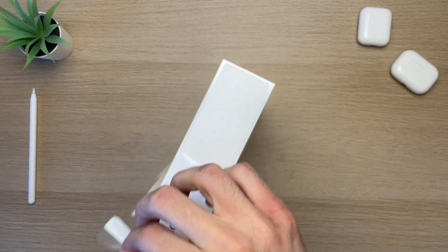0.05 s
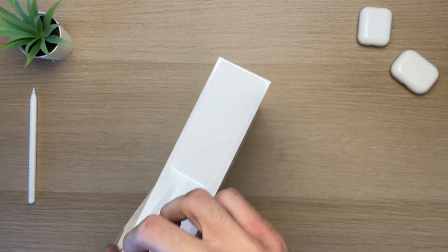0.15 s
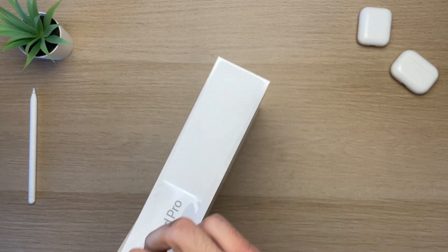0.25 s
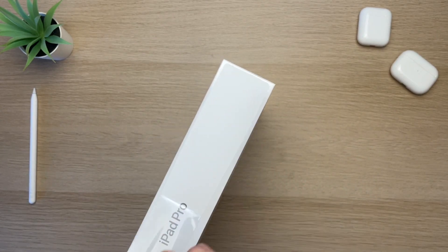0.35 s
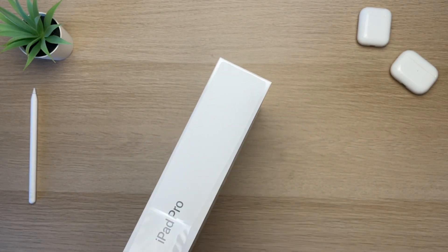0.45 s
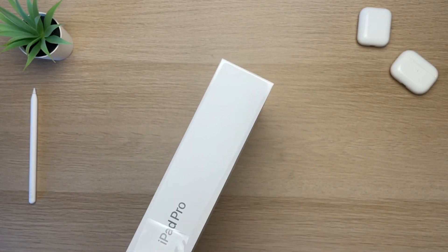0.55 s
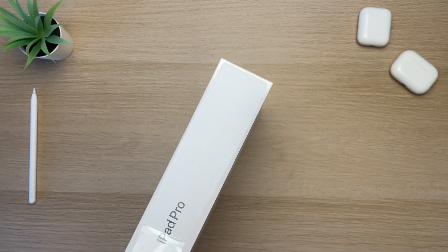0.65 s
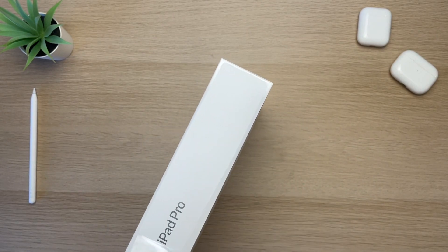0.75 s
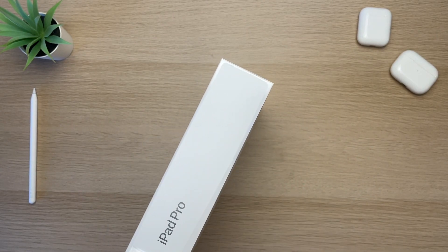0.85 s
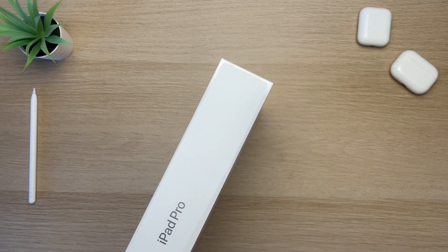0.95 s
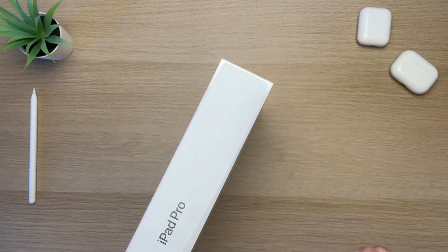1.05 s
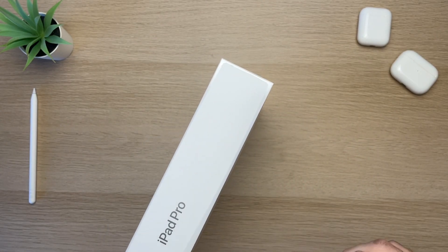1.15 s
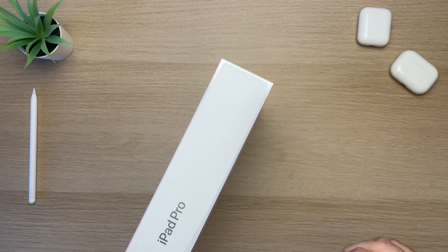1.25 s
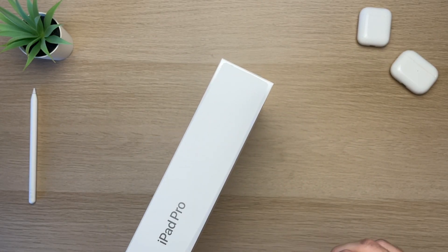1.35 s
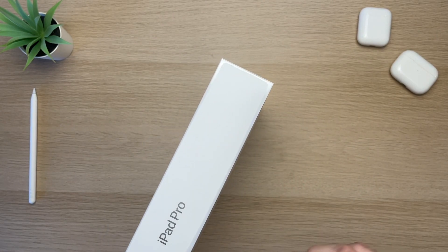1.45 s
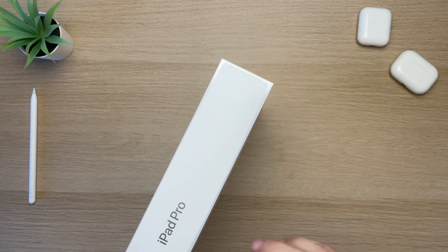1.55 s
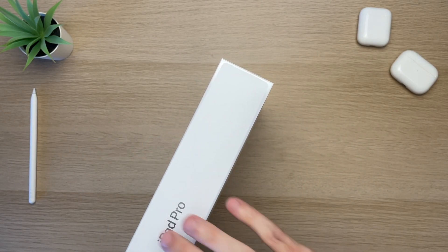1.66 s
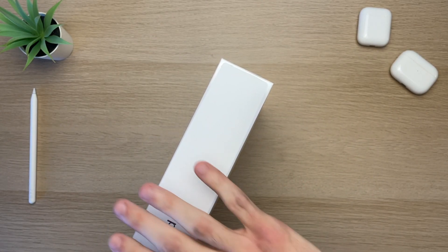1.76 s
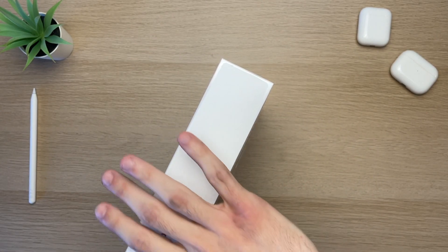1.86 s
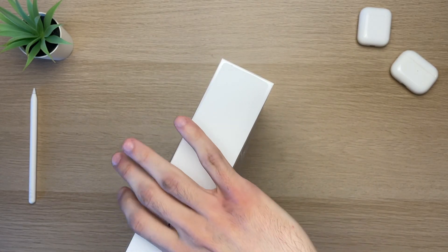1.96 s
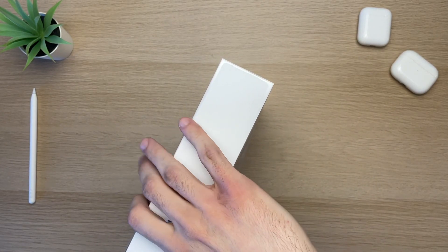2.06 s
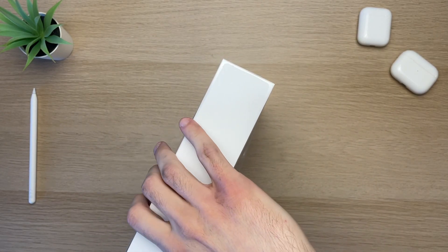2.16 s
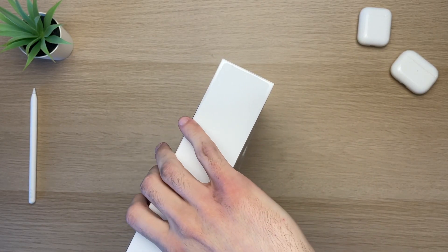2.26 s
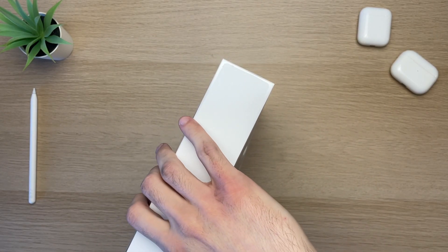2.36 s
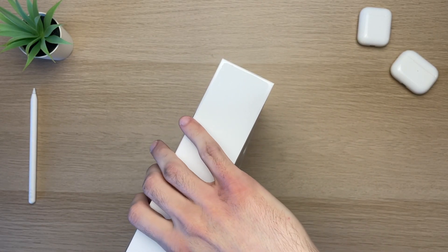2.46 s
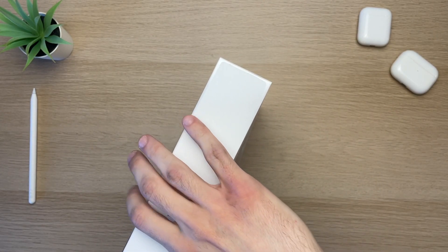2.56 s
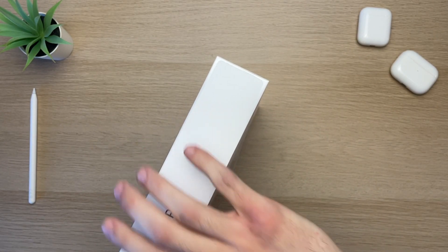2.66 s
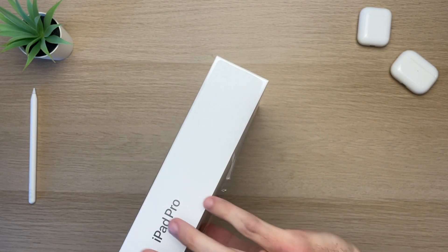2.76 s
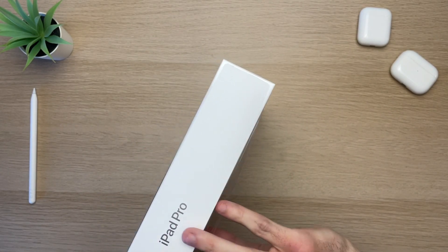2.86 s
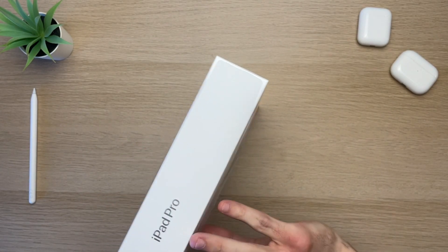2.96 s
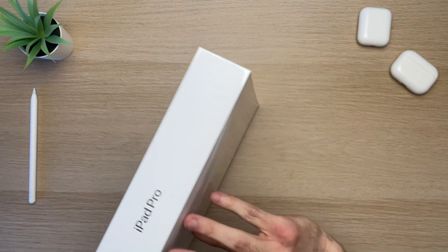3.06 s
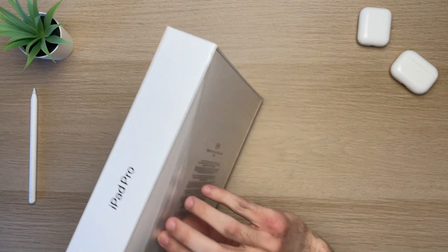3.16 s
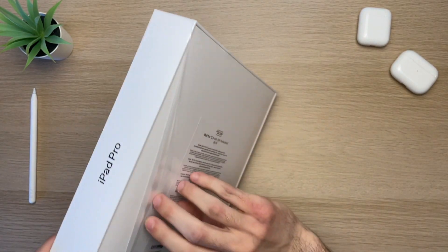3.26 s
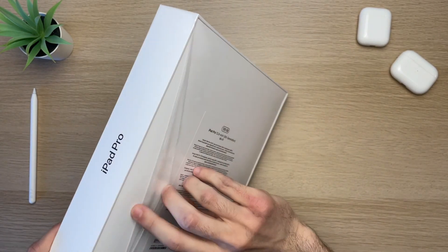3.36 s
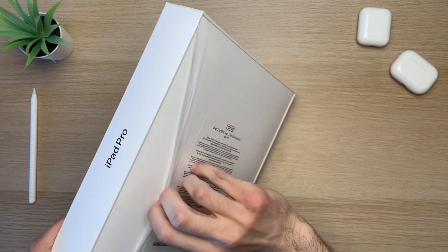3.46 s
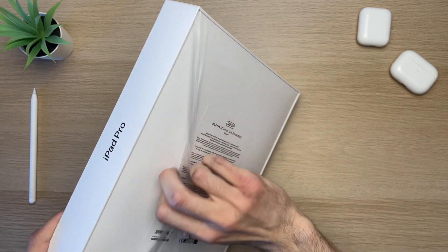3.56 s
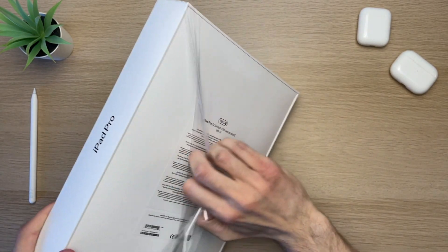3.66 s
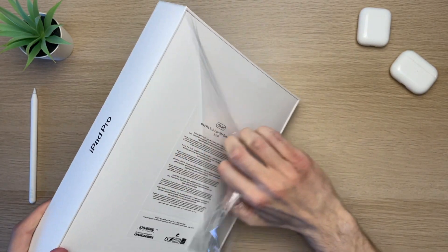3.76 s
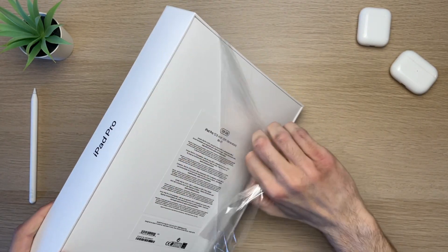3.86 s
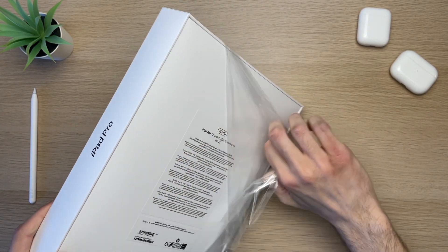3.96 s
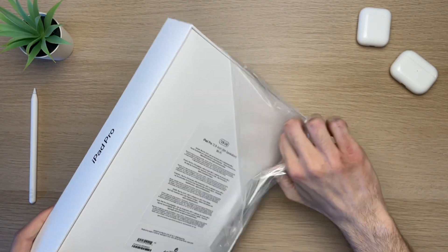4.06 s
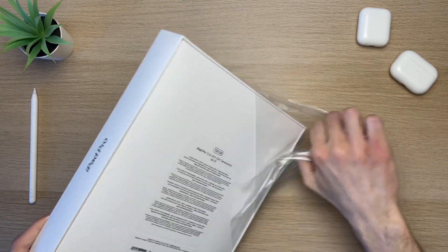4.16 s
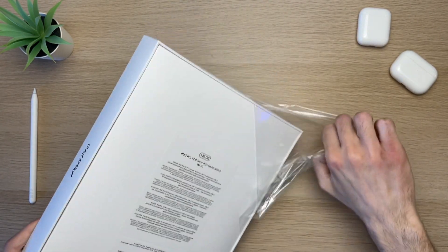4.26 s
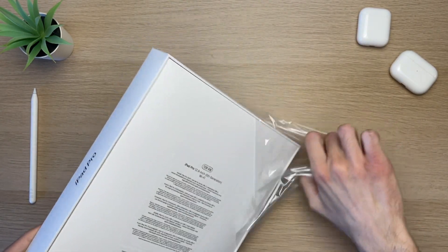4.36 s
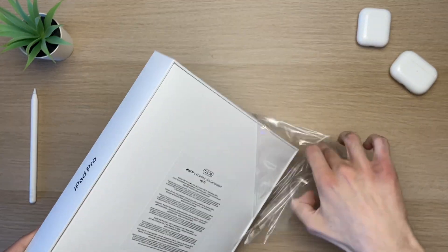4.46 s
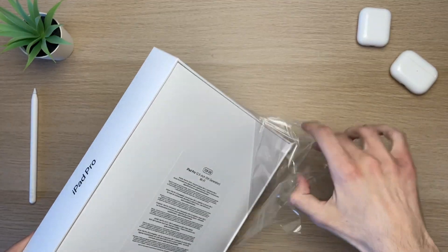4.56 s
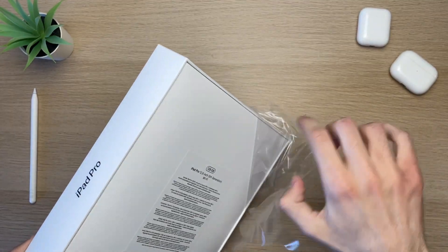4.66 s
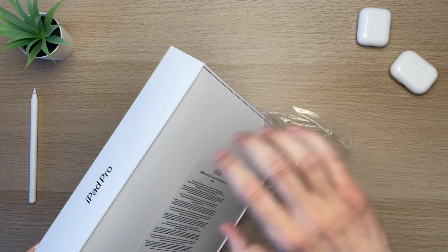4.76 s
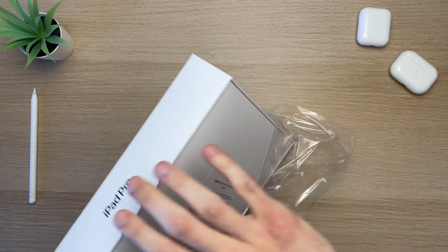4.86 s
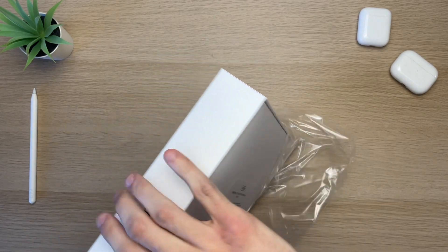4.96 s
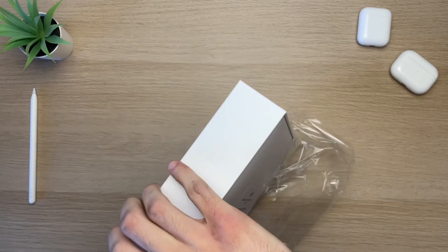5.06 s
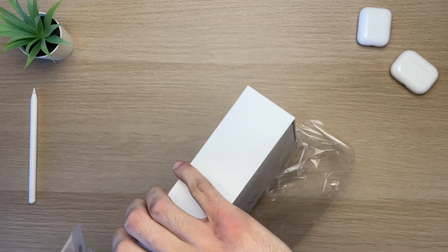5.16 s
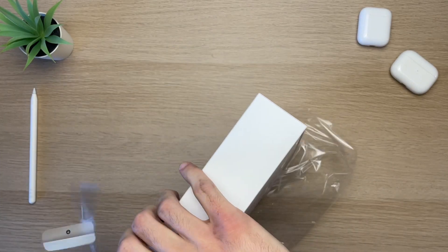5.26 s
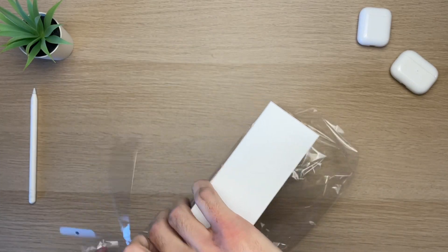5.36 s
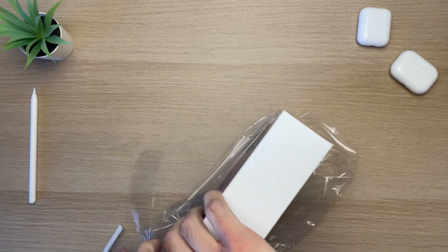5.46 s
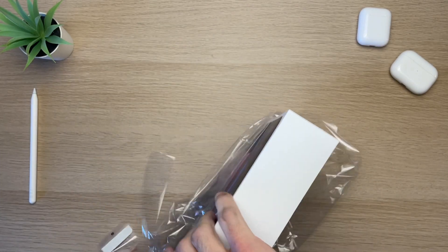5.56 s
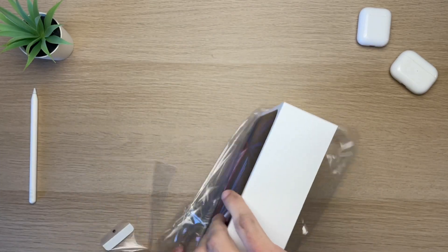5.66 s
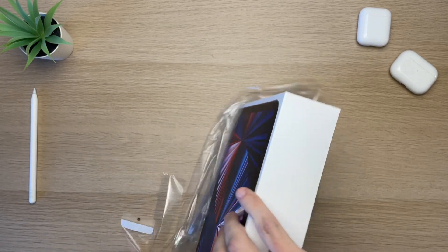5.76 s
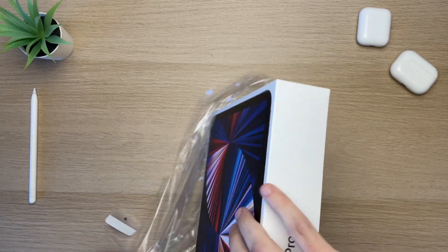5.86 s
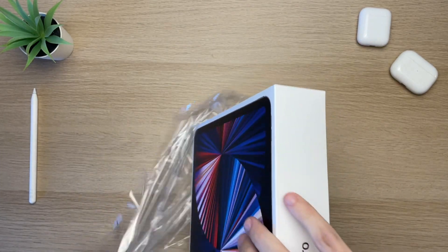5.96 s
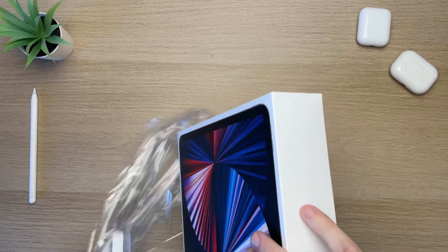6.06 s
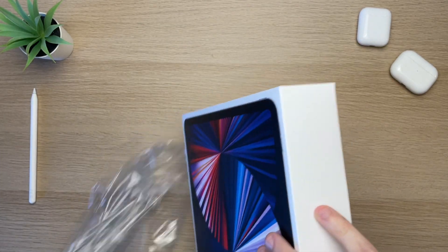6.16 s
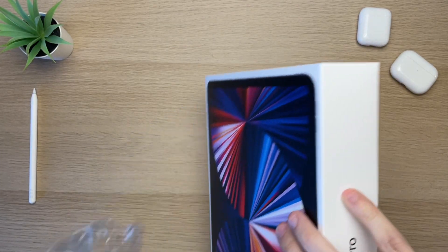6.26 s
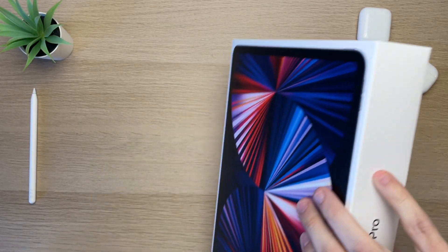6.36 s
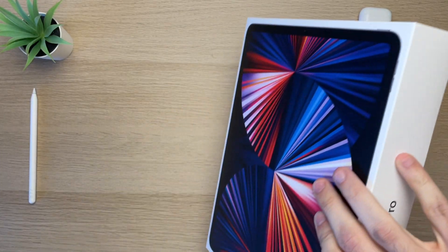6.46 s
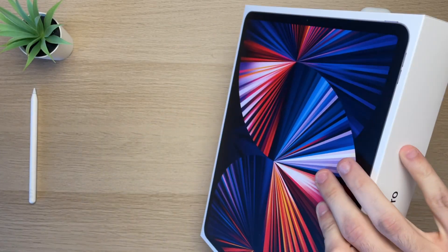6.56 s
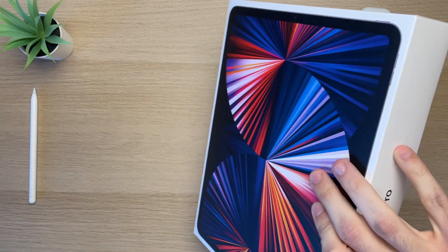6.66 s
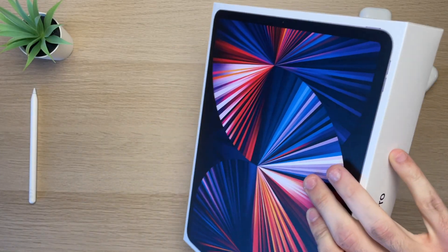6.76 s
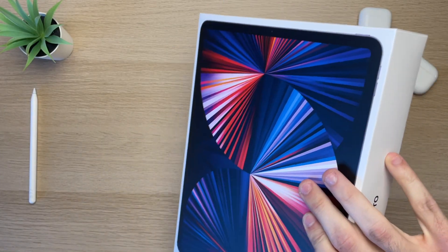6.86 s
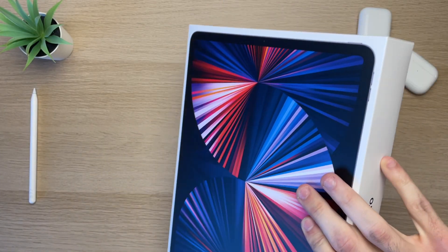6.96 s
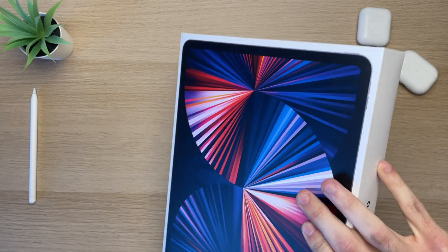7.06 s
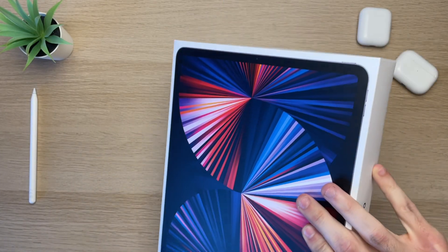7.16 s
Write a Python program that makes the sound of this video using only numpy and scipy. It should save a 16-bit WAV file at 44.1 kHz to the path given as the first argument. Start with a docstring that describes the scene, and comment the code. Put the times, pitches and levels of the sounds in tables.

```python
"""Shrink film is stripped off a cardboard box on a wooden table, heard close up in stereo in a small room.
The film snaps and rips in noise bursts and plucked tones; it slides off in a hiss of tiny noise grains.
Hands rub and knock the box (noise through its resonances), which rocks and drops on the table (low tones).
A fingertip squeaks on it (sawtooth jerks). A soft echo and a low murmur of the room surround it all."""
import sys
import numpy as np
from scipy import signal
from scipy.fft import rfft, irfft, next_fast_len
from scipy.io import wavfile
from scipy.ndimage import uniform_filter1d, map_coordinates

SR = 44100
rng = np.random.default_rng(int(sys.argv[2]) if len(sys.argv) > 2 else 0)


def store_wav(level_fs):
    """Save 16-bit WAV to argv[1]."""
    pcm = np.round(np.clip(np.atleast_2d(level_fs), -1, 1) * 32767)
    wavfile.write(sys.argv[1], SR, pcm.T.astype(np.int16))


N = 318402
TIME = np.arange(N) / SR
HIT = TIME[:SR // 3]  # time axis of one short sound, s

# Levels in the tables are relative: later steps mix, colour and turn the sounds down further.
# t60 is the time to fade by 60 dB. Spectra are scaled to the same energy, so only their shape counts.

# Pulls that slide the loose film over the box: start_s, length_s, rustle_db, hiss_db, swell_db (start to end)
FILM_PULLS = [(0.0, 0.15, -64.5, -65.5, 12), (0.645, 0.065, -65, -76, 14), (0.765, 0.6, -82, -72, -13),
              (1.407, 0.14, -64, -68, 1), (1.798, 0.17, -48, -50, -5), (1.963, 0.2, -57.5, -63.5, -5),
              (2.28, 0.096, -63.5, -66, -10), (2.431, 0.18, -60, -61.5, 6),
              (2.885, 0.45, -60.5, -64.5, 6.5), (3.452, 0.034, -53.5, -43, -7.5),
              (3.554, 0.41, -42, -48.5, -2.5), (4.018, 0.07, -43, -43.5, 1), (4.118, 0.11, -37.5, -38.5, 4),
              (4.33, 0.27, -47, -49, 7.5), (4.642, 0.012, -40, -45.5, 9.5), (4.757, 0.34, -59.5, -74, 5),
              (5.068, 0.56055, -46, -47, 7.5), (5.675, 0.19, -37, -39, 2), (5.893, 0.29, -42.5, -45, -2.5),
              (6.227, 0.19, -43, -48.5, -1), (6.43, 0.24, -54.5, -57, 0.5), (6.72, 0.38, -67, -74, -14.5)]
PULL_RISE, PULL_FALL = 360, 293  # dB per s before and after a pull
# Crinkling after a snap: rustle and hiss against the snap level (dB), fall (dB per s)
SETTLE_DB, SETTLE_HISS_DB, SETTLE_FALL = -28, -42, 146
HELD_DB = -7.5  # box share above which a crease lies against the cardboard and settles less
# Stray ticks: their level (dB) at this rustle level (dB), and dB of change per dB of rustle
TICK_DB, TICK_AT_DB, TICK_FOLLOWS = -58.5, -46.5, 0.65
# Flipping facets of loose film: how many per s, middle pitch (Hz), cycles to t60, level against the rustle (dB)
FACETS_PER_S, FACET_HZ, FACET_CYCLES, FACET_DB = 460, 3020, 18, -11
# Spectrum of the film's rustle: freq_hz, level_db
RUSTLE_SPECTRUM = [(200, -25), (700, -6.5), (1200, -7), (2900, -1.5), (4300, -4), (5700, -0.5),
                   (7500, -7.5), (10000, -12.5), (15500, -39.5)]
# Spectrum of the film's fine hiss: freq_hz, level_db
HISS_SPECTRUM = [(3000, -43), (6000, 2), (7500, -0.5), (9800, 4), (11500, -1), (13300, -1.5), (15500, -7.5)]

# The box rocking on the table, and bouncing after its drop (rows after 4.42 s): start_s, level_db, pitch_hz (of
# the push of air)
BOX_THUMPS = [(0.074, -36.5, 110), (1.64, -37, 70), (2.972, -35, 65), (3.234, -32, 133),
              (3.864, -27, 70.8), (4.216, -26.5, 77.1), (4.248, -31, 70.5), (4.429, -12, 92.5),
              (4.445, -17, 124), (4.487, -18, 93), (4.678, -35.5, 111), (5.335, -36, 72.4)]
# Ringing of the table top under the box: pitch_hz, level_db, t60_s
TABLE_MODES = [(67, 0.5, 0.34), (132, 0, 0.24), (187.72, -7, 0.39)]

# Creases snapping through: start_s, level_db, box_share_db, sizzle_share_db
FILM_SNAPS = [(0.1118, -29, -16, -13), (0.6286, -38.5, -4, -40), (0.7355, -29.5, -13.5, -14),
              (0.8086, -44.5, -10, -15), (1.29, -46, -7, -13.5), (1.322, -47, -17, -10),
              (1.4016, -36, -4, -11), (1.537, -26.5, -8.5, -13.5), (1.5881, -19.5, -11.5, -20),
              (1.6282, -20.5, -12, -16), (1.632, -7, -19, -14), (1.662, -10.5, -19, -20),
              (1.7781, -10.5, -21, -16), (1.8574, -15, -12.5, -18.5), (1.918, -16.5, -11.5, -15),
              (1.9288, -22, -3, -12), (2.3545, -47, -21, -3), (2.4478, -40, -19, -6),
              (2.501, -41.5, -7, -11), (2.5615, -38, -8, -8), (2.6238, -33.5, -13, -13),
              (2.6348, -32.5, -19, -25), (2.671, -42.5, -6, -11), (2.7566, -43, -27, -10),
              (2.827, -42, -6, -14), (2.9588, -32.5, -3.5, -20), (3.133, -27.5, 3, -12),
              (3.176, -8, -7.5, -15.5), (3.537, -5.5, -12.5, -43), (3.732, -15, -2, -9),
              (3.762, -15, -9.5, -24.5), (3.795, -16, -24.5, -6.5), (3.803, -13.5, -4, -6.5),
              (3.8491, -7, -18, -7.5), (3.853, -13, 0.5, -18), (3.93, -26, -3, -22),
              (3.9599, -16.5, -12, -14.5), (4.008, -24.5, -1.5, -19.5), (4.0271, -18, 0.5, -12.5),
              (4.036, -23, -16, -11.5), (4.119, -13.5, -12, -13), (4.124, -16.5, -6, -10),
              (4.142, -18, -19, -15), (4.1728, -19.5, -5, -18), (4.214, -19.5, -26, -11),
              (4.3436, -23.5, -26, -9.5), (4.5204, -24, -24.5, -6), (4.75, -36, -24, -12),
              (4.7746, -34.5, -5, -20), (4.993, -36, -26, -14), (5.4924, -12.5, -32, -11),
              (5.766, -24, -22, -12), (5.824, -27, -10, -2), (5.777, -25.5, -16, -4),
              (5.8438, -24, -19, -6), (5.984, -25.5, -34.5, -6.5), (6.0782, -14, -14, -16),
              (6.1439, -34, -19.5, -23.5), (6.773, -41, -25, -12), (6.834, -39, -7.5, -17),
              (7.142, -48.5, -2, -24), (7.207, -49.5, -0.5, -25)]
# Spectrum of a snap: freq_hz, level_db
SNAP_SPECTRUM = [(150, -20.5), (600, -14.5), (1500, -5), (2800, 0.5), (4300, -2.5), (5600, 0.5),
                 (8000, 5.5), (11000, -38), (15500, -8)]
# Spectrum of the finer sizzle of a snap: freq_hz, level_db
SIZZLE_SPECTRUM = [(2000, -41), (5000, -23.5), (7500, 11), (10500, 3.5), (13300, -2.5), (15500, 4.5)]
# Resonances of the cardboard panels: pitch_hz, width_hz, level_db
BOX_MODES = [(295, 72, -2), (410, 35, -1), (487, 68, -1.5), (675, 84, -0.5), (748, 99, -0.5),
             (947, 224, -8.5), (1110, 47, -10), (1285, 100, -5.5), (1887, 101.32, -14.5),
             (2320, 330, -20.5)]

# Hands dragging on the box and shifting it: start_s, length_s, rub_db, rumble_db, swell_db (start to end)
HAND_DRAGS = [(1.614, 0.04666, -55, -46, 0), (1.818, 0.14, -45, -46.5, 0), (2.095, 0.66, -66.5, -58.5, 4.5),
              (2.884, 0.12, -54, -47, 1), (3.12, 0.075, -43, -44.5, 10), (3.236, 0.067, -34.5, -41.5, -3.5),
              (3.334, 0.26, -40, -42, -6), (3.563, 0.24, -35.5, -43, 10), (3.873, 0.35, -41, -44.5, 8),
              (4.3, 0.16, -42, -48, 9.5), (4.571, 0.1, -40.5, -44, -6), (4.981, 0.67, -54, -52, -1),
              (5.745, 0.42, -51, -53.5, -0.5), (6.177, 0.56, -62.5, -67, 2), (6.898, 0.16, -59.5, -70.5, 3)]
DRAG_RISE, DRAG_FALL = 680, 185  # dB per s before and after a drag
RUMBLE_RISE, RUMBLE_FALL = 249.2, 66  # dB per s: the heavy box starts and stops more slowly
# Spectrum of skin rasping on cardboard: freq_hz, level_db
RASP_SPECTRUM = [(300, 6), (600, 0), (1100, 3), (1450, -18), (1800, -7), (2500, -18), (3200, -6),
                 (3900, -5), (4400, -15), (10000, -32)]
# Spectrum of the box shifting on the table: freq_hz, level_db
RUMBLE_SPECTRUM = [(20, -32), (38, -9), (70, -2), (95, -2), (135, 0), (200, -9), (800, -45)]

# The rip advancing in jerks: start_s, crack_db, low_pitch_hz, low_db, high_pitch_hz, high_db (film tones)
FILM_RIPS = [(1.81, -18.5, 720, -24.5, 2100, -28), (3.538, -22.5, 610, -20, 1280, -9.5),
             (3.556, -20, 605, -22.5, 2330, -13), (3.59, -21, 590, -22, 2200, -26),
             (3.612, -20.5, 1280, -16, 1750, -22.5), (3.637, -24.5, 1100, -29.5, 2700, -20.5),
             (3.6423, -23.5, 580, -15.5, 1340, -19), (3.657, -31.5, 650, -30, 1300, -18.5),
             (3.665, -24.5, 853, -23.5, 1290, -20.5), (3.685, -18, 595, -14, 1300, -9.5),
             (3.705, -20, 708, -12, 1600, -18.5), (3.7215, -17.5, 720, -13.5, 1800, -12),
             (3.734, -18.5, 800, -12.5, 1830, -22), (3.749, -14.5, 1850, -15.5, 3130, -12),
             (3.7526, -14.5, 720, -14.5, 2100, -18.5), (3.762, -19, 869.5, -26.5, 2550, -19.5),
             (3.7835, -15, 760, -7.5, 2120, -6.5), (3.796, -20.5, 785, -14.5, 2000, -16),
             (3.8029, -8, 1156, -2.5, 2750, -10.5), (3.8055, -16.5, 668, -3.5, 1900, -15),
             (3.85, -6, 1390, -7.5, 2560, -1)]
LOW_CYCLES, HIGH_CYCLES = 13.7, 23.5  # cycles until a pluck of the film has faded by 60 dB
# Spectrum of a tear: freq_hz, level_db
RIP_SPECTRUM = [(120, -21.5), (450, 0), (800, -4), (1600, -1), (2500, -1.5), (3200, 1), (4200, -19.5),
                (6000, -9.5), (15500, -17)]

# Hands and table knocking on the box: start_s, level_db, pitch_hz (of the struck panel)
BOX_KNOCKS = [(1.814, -32.5, 283), (1.926, -33.5, 295), (2.673, -41, 265), (2.872, -41, 310),
              (3.177, -22, 482), (4.393, -11.5, 1273), (4.394, -25.5, 2095), (4.396, -12, 743),
              (5.035, -38, 294), (6.528, -30.5, 309), (6.758, -48.5, 825), (7.144, -42, 367)]
# Stretched film chattering over an edge of the box: start_s, length_s, level_db, pitch_hz
FILM_CHATTERS = [(3.232, 0.077, -46, 1840), (4.063, 0.05, -37.5, 724), (4.418, 0.042, -39, 780),
                 (5.764, 0.057, -47.5, 1370), (6.236, 0.049, -47.5, 2400)]
CHATTER_RISE, CHATTER_FALL = 350, 430  # dB per s before and after a chatter
# The box dropping on the table: time (s), level (dB)
LAND_S, LAND_DB = 4.3977, -4.5
# Its first and last pitch (Hz), time scale of the sinking pitch (s), t60 (s)
LAND_START_HZ, LAND_END_HZ, LAND_SINK_S, LAND_T60 = 192, 57.3, 0.009, 0.11
# Two squeaks of a fingertip sticking and slipping, each a list of: time_s, slips_per_s (on average), level_db
FINGER_SQUEAKS = [
    [(5.483, 2030, -29), (5.494, 1880, -40), (5.496, 910, -34), (5.513, 790, -30), (5.516, 275, -35.5),
     (5.550, 250, -34.5), (5.568, 170, -67)],
    [(6.89, 62, -57), (6.94, 77, -57.5), (6.985, 85, -52.5), (7.005, 200, -88.5), (7.026, 224, -41),
     (7.050, 220, -51), (7.068, 120, -46), (7.085, 140, -73)],
]
# Colour of the box under a slipping finger: freq_hz, level_db
FINGER_SPECTRUM = [(100, -1), (270, -2.5), (430, 7), (600, -6), (850, 2), (1150, -20), (1400, -7),
                   (1900, 7.5), (4000, -8.5)]

# Spectrum of the room's low murmur: freq_hz, level_db
AMBIENCE_SPECTRUM = [(20, -25.5), (38, -5.5), (60, 2.5), (190, -1), (270, -10.5), (450, -17.5),
                     (1000, -22.5), (2000, -37.5), (5000, -37), (15500, -42)]
# How long the room echoes: freq_hz, t60_s
ROOM_ECHO = [(100, 0.5), (600, 0.21), (3000, 0.15), (8000, 0.11), (16000, 0.17)]
# How alike left and right are: freq_hz, likeness (0 to 1; anything above counts as 1)
STEREO_LIKENESS = [(60, 1), (200, 0.88), (500, 0.2139), (1500, 0.27), (3000, 0.68), (6000, 0.46),
                   (7500, 1.11), (9200, 0.42), (10700, 1.4), (13000, 1.2)]
# Phase of left ahead of right: freq_hz, lead_radians
STEREO_LEAD = [(600, 0), (950, .3), (1800, .1), (3100, 1), (4600, .2), (5400, -.1), (6800, -3.05),
               (8000, -3.2), (10400, -6.15), (11900, -6.35), (13800, -9.3)]
# How much louder left is than right: freq_hz, tilt_db
STEREO_TILT = [(100, 0.05), (400, 1.5), (2400, 1.1), (3500, 3.5), (5600, 2.8), (7000, 0.69)]
TOP_HZ = 16000  # upper band limit


def amp(db):
    """Decibels to gain."""
    return 10 ** (np.asarray(db) / 20)


def unit(x):
    """Scale to an average strength (rms) of 1."""
    return x / np.sqrt(np.mean(x ** 2) + 1e-20)


def along(points, hz):
    """Read a (frequency, value) table between its points, on a log frequency axis."""
    f, v = np.transpose(points)
    return np.interp(np.log(hz + 1), np.log(f + 1), v)


def curves(rows):
    """One line of values over time for each column after the time."""
    s, *cols = np.transpose(rows)
    return [np.interp(TIME, s, c) for c in cols]


def filtered(x, response):
    """Multiply the spectrum of x by a function of frequency."""
    n = x.shape[-1]
    m = next_fast_len(n + SR // 4)
    return irfft(rfft(x, m) * response(np.fft.rfftfreq(m, 1 / SR)), m)[..., :n]


def coloured(x, spectrum):
    """Give x a spectrum, by a filter of unit energy that never sounds before its input."""
    size = 4096
    hz = np.fft.rfftfreq(size, 1 / SR)
    # folding the cepstrum forward puts all of the filter after time zero
    cepstrum = irfft(np.log(amp(along(spectrum, hz))))
    cepstrum[1:size // 2] *= 2
    cepstrum[size // 2 + 1:] = 0
    kernel = irfft(np.exp(rfft(cepstrum)))
    kernel = kernel / np.linalg.norm(kernel)
    return signal.fftconvolve(x, kernel[None], axes=1)[:, :x.shape[1]]


def cardboard(hz, damping=1):
    """Resonances of the box panels, of unit mean power; a hand lying on them (damping) widens them."""
    response = 0
    for k, (centre, width, db) in enumerate(BOX_MODES):
        loss = 1j * hz * width * damping
        # the sign flips from one resonance to the next
        response = response + (-1) ** k * amp(db) * loss / (centre * centre - hz * hz + loss)
    return response / np.sqrt(np.mean(abs(response) ** 2))


def fade(t60, attack):
    """Loudness shape of one blow: a quick rise, then a steady fall in dB."""
    return amp(-60 * HIT / max(t60, .002)) * (1 - np.exp(-HIT / attack))


def tone(hz, t60, attack):
    """One struck resonance: a fading sine."""
    return fade(t60, attack) * np.sin(2 * np.pi * hz * HIT)


def burst(t60, attack, lumps_db=1.5):
    """Two fading noises, lumpy with tiny slips, each with the energy of its fade."""
    shape = fade(t60, attack)
    slow_noise = uniform_filter1d(rng.standard_normal(len(HIT)), size=24)
    lumps = amp(lumps_db * unit(slow_noise))
    x = shape * lumps * rng.standard_normal((2, len(HIT)))
    return x * np.linalg.norm(shape) / np.linalg.norm(x, axis=1, keepdims=True)


def add(track, s, sound):
    """Mix a sound into the track at time s."""
    part = track[..., max(round(s * SR), 0):][..., :sound.shape[-1]]
    part += sound[..., :part.shape[-1]]


def wobble(rate):
    """A smooth random curve through this many random points per second."""
    return map_coordinates(rng.standard_normal(int(N * rate / SR) + 4), [TIME * rate / SR])


def crackle(rate, spread_db, life, smooth):
    """Noise of rms about 1: tiny bursts of scattered size over a share of smooth friction."""
    starts = rng.random(N) < rate / SR
    sizes = starts * amp(spread_db * np.minimum(rng.standard_normal(N), 2.5))
    power = signal.lfilter([1], [1, -np.exp(-2 / (life * SR))], sizes ** 2)
    share = np.clip(smooth, 0, 1)
    return np.sqrt(share + (1 - share) * power / power.mean()) * rng.standard_normal((2, N))


def patchy(x, depth_db):
    """The colour of a moving sheet shifts from moment to moment; rms 1."""
    z = signal.stft(x, nperseg=512)[2]
    field = rng.standard_normal(z.shape[1:])
    field = uniform_filter1d(field, size=4, axis=0)  # blur over frequency
    field = uniform_filter1d(field, size=6, axis=1)  # blur over time
    return unit(signal.istft(z * amp(depth_db * unit(field)), nperseg=512)[1][:, :N])


def stroke(start, length, swell_db, rise, fall):
    """Power of one movement: it gathers speed, swells or slackens evenly, and dies away (dB per s)."""
    t = TIME - start
    swell = swell_db * (np.clip(t / length, 0, 1) - .5)
    db = swell + rise * np.minimum(t, 0) - fall * np.maximum(t - length, 0)
    return np.exp(np.log(10) / 10 * np.maximum(db, -150))


def film_motion():
    """Gains of rustle and hiss: the film sounds while it is pulled and goes on settling after every snap."""
    kicks = np.zeros(N)
    for s, db, box_db, _ in FILM_SNAPS:
        kicks[round(s * SR)] += amp(db) ** 2 / (1 + amp(box_db - HELD_DB) ** 2)
    settling = signal.lfilter([1], [1, -amp(-SETTLE_FALL / SR) ** 2], kicks)
    rustle_power = amp(SETTLE_DB) ** 2 * settling
    hiss_power = amp(SETTLE_HISS_DB) ** 2 * settling
    for start, length, rustle_db, hiss_db, swell_db in FILM_PULLS:
        power = stroke(start, length, swell_db, PULL_RISE, PULL_FALL)
        rustle_power += amp(rustle_db) ** 2 * power
        hiss_power += amp(hiss_db) ** 2 * power
    return np.sqrt(rustle_power), np.sqrt(hiss_power)


def facets():
    """Small facets of loose film flip and ring briefly; pitch wanders as the folds change size; rms 1."""
    count = int(FACETS_PER_S * N / SR)
    t = HIT[:SR // 80]
    pitch, size, aside = rng.standard_normal((count, 3)).T
    starts = rng.integers(N - len(t), size=count)
    hz = FACET_HZ * np.exp(0.3 * pitch + 0.22 * wobble(16)[starts])
    hz = np.clip(hz, SR / 50, SR / 4)[:, None]
    gain = amp(3.8 * np.minimum(size, 1.8))[:, None]
    grains = gain * amp(-60 * hz * t / FACET_CYCLES) * np.sin(2 * np.pi * hz * t)
    grains_aside = grains * np.tanh(aside)[:, None]  # each facet gets its own place in stereo
    at = (starts[:, None] + np.arange(len(t))).ravel()
    return unit(np.array([np.bincount(at, g.ravel(), N) for g in (grains, grains_aside)]))


def sliding_film():
    """Countless creases give way and facets flip as loose film slides in surges; larger ones tick."""
    rustle_gain, hiss_gain = film_motion()
    surge_db = 2.16 * wobble(40) + 1.0 * wobble(13)
    creases = patchy(crackle(rate=700, spread_db=6.0, life=0.0016, smooth=0.57), depth_db=2.5)
    rustle = coloured(creases, RUSTLE_SPECTRUM) + amp(FACET_DB) * facets()
    rustle = rustle_gain * amp(surge_db - 2.0) * rustle
    fine = crackle(rate=790, spread_db=4.0, life=0.0006, smooth=0.65)
    hiss = hiss_gain * amp(surge_db - 1.3) * coloured(fine, HISS_SPECTRUM)
    tick_gain = amp(TICK_DB) * (rustle_gain / amp(TICK_AT_DB)) ** TICK_FOLLOWS
    ticks = tick_gain * crackle(rate=45, spread_db=3.0, life=0.0027, smooth=0)
    tick_sound = coloured(ticks, SNAP_SPECTRUM) + amp(3.0) * coloured(ticks, SIZZLE_SPECTRUM)
    return rustle + hiss + tick_sound


def murmur():
    """The low murmur of the room is steady noise, strongest in the bass."""
    return amp(-52.5) * coloured(rng.standard_normal((2, N)), AMBIENCE_SPECTRUM)


def thumps():
    """The box rocks, and bounces after its drop: each contact is one short push of air and a weak ring of the
    table."""
    table = np.zeros((2, N))
    ring = sum(amp(db) * tone(hz, t60, attack=0.0023) for hz, db, t60 in TABLE_MODES)
    for s, db, hz in BOX_THUMPS:
        cycles = hz * HIT
        push = np.sin(2 * np.pi * cycles) * np.exp(-((cycles - .5) / 0.95) ** 2)
        add(table[0], s, -amp(db) * (push + amp(-18.0) * ring))
    return table


def snaps():
    """A crease flips with a crack, sheds a finer sizzle and jolts the panel beneath it."""
    cracks, sizzle, jolts = np.zeros((3, 2, N))
    for s, db, box_db, sizzle_db in FILM_SNAPS:
        add(cracks, s, amp(db - 5.0) * burst(t60=0.023, attack=0.00019))
        add(sizzle, s, amp(db + sizzle_db + 6.0) * burst(t60=0.023, attack=0.00025))
        add(jolts, s, amp(db + box_db + 1.5) * burst(t60=0.013, attack=0.00027))
    film = coloured(cracks, SNAP_SPECTRUM) + coloured(sizzle, SIZZLE_SPECTRUM)
    return film + filtered(jolts, cardboard)


def rubbing():
    """Fine slips of the hands rasp and excite the panels, which the hands also damp."""
    power = np.zeros(N)
    for start, length, rub_db, _, swell_db in HAND_DRAGS:
        power += amp(rub_db) ** 2 * stroke(start, length, swell_db, DRAG_RISE, DRAG_FALL)
    slips = patchy(crackle(rate=380, spread_db=3.5, life=0.0022, smooth=0.47), depth_db=2.5)
    pressure = amp(1.2 * wobble(35))

    def damped_panels(hz):
        return cardboard(hz, damping=1.27) * (1 + hz / 2200) / (1 + (hz / 2400) ** 4)

    panels = unit(filtered(slips, damped_panels))
    skin = coloured(rng.standard_normal((2, N)), RASP_SPECTRUM)
    return np.sqrt(power) * pressure * (amp(-3.0) * panels + amp(-11.5) * skin)


def shifting():
    """The box rumbles as each drag turns it on the table."""
    power = np.zeros(N)
    for start, length, _, rumble_db, swell_db in HAND_DRAGS:
        power += amp(rumble_db) ** 2 * stroke(start, length, swell_db, RUMBLE_RISE, RUMBLE_FALL)
    return np.sqrt(power) * coloured(rng.standard_normal((2, N)), RUMBLE_SPECTRUM)


def rips():
    """Each jerk of the tear cracks, plucks two tones of the film like a drum skin, and rings the box."""
    tears, skin = np.zeros((2, 2, N))
    for s, crack_db, low_hz, low_db, high_hz, high_db in FILM_RIPS:
        add(tears, s, amp(crack_db - 3.0) * burst(t60=0.02, attack=0.00046))
        add(skin[0], s, amp(low_db) * tone(low_hz, t60=LOW_CYCLES / low_hz, attack=0.001))
        add(skin[0], s, amp(high_db) * tone(high_hz, t60=HIGH_CYCLES / high_hz, attack=0.001))
    return coloured(tears, RIP_SPECTRUM) + skin + amp(-8.0) * filtered(tears, cardboard)


def knocks():
    """A blow rings the struck panel for a few cycles; a low-pitched blow stirs the other panels less."""
    panel, blows = np.zeros((2, 2, N))
    for s, db, hz in BOX_KNOCKS:
        add(panel[0], s, amp(db) * tone(hz, t60=0.029 + 13 / hz, attack=0.00042))
        add(blows, s, amp(db + 1.5) * hz / 1200 * burst(t60=0.035, attack=0.00095))
    return panel + filtered(blows, lambda hz: cardboard(hz) * hz / (hz + 450))


def chatter():
    """Quick uneven slips over an edge drive a broad resonance of the stretched film."""
    out = np.zeros((2, N))
    for start, length, db, hz in FILM_CHATTERS:
        slips = crackle(rate=230, spread_db=0.5, life=0.0024, smooth=0.1)
        ring = unit(signal.lfilter(*signal.iirpeak(hz, 3.5, SR), slips))
        power = stroke(start, length, 0, CHATTER_RISE, CHATTER_FALL)
        out += amp(db) * np.sqrt(power) * ring
    return out


def landing():
    """The box hits the table: a thud whose pitch sinks as the air cushion beneath it escapes."""
    hz = LAND_END_HZ + (LAND_START_HZ - LAND_END_HZ) * np.exp(-HIT / LAND_SINK_S)
    wave = np.sin(2 * np.pi * np.cumsum(hz) / SR)
    thud = np.zeros((2, N))
    add(thud[0], LAND_S, amp(LAND_DB) * fade(LAND_T60, attack=0.0021) * wave)
    return thud


def squeaks():
    """Skin slips on the box in sawtooth jerks: fast slips sing cleanly, slow ones rasp."""
    jerks, rasp = np.zeros((2, 2, N))
    for rows in FINGER_SQUEAKS:
        rate, db = curves(rows)
        on = (TIME > rows[0][0]) & (TIME < rows[-1][0])
        uneven_rate = rate * (1 + wobble(303) / np.sqrt(rate))
        phase = (2 * np.pi * np.cumsum(uneven_rate) / SR)[on]
        saw = 0
        for k in range(1, 8):  # overtones, weaker the higher they lie
            saw = saw + np.sin(k * phase) / k ** 0.65 / (1 + (k * rate[on] / 1500) ** 4)
        jerks[0, on] += amp(db[on]) * unit(saw)
        # one puff of noise per slip
        puffs = unit((1 + np.cos(phase)) ** 4 * rng.standard_normal((2, len(phase))))
        rasp[:, on] += amp(db[on] - 4.5) * (200 / rate[on]) ** 0.56 * puffs
    return amp(-6.0) * coloured(jerks, FINGER_SPECTRUM) + coloured(rasp, RASP_SPECTRUM)


def room(x):
    """The walls answer with a quickly swelling echo, each frequency dying at its own speed."""
    hz, t, z = signal.stft(rng.standard_normal((2, SR // 2)), SR, nperseg=256)
    decay = amp(-60 * t / along(ROOM_ECHO, hz)[:, None])
    tail = signal.istft(z * decay, SR, nperseg=256)[1]
    tail = tail * (1 - np.exp(-TIME[:tail.shape[1]] / 0.00088))
    return signal.fftconvolve(x[:1], tail / np.linalg.norm(tail[0]), axes=1)[:, :N]


def stereo(pair):
    """A shared and an unshared part make left and right, whose phases differ by a table over frequency."""
    def split(hz):
        turn = np.arccos(np.clip(along(STEREO_LIKENESS, hz), 0, 1)) / 2
        return np.array([np.cos(turn), 1j * np.sin(turn)])

    sides = np.array([[.5], [-.5]])  # left and right each take half of a difference

    def left_right(hz):
        return amp(sides * along(STEREO_TILT, hz)) * np.exp(1j * sides * along(STEREO_LEAD, hz))

    shared, apart = filtered(pair, split)
    return filtered(np.array([shared + apart, shared - apart]), left_right)


def scene():
    """Film, box and table in a murmuring room; hits sound much alike on left and right."""
    # the two rows are the shared and the unshared part; hits have less of the second
    hits = (snaps() + rips() + knocks() + squeaks()) * amp([[0], [-5]])
    near = sliding_film() + hits + rubbing() + chatter()
    low = thumps() + shifting() + landing()
    return stereo(near + amp(-10.5) * room(near) + low + murmur())


def record(dry):
    """Thin the deepest bass, round off the sharpest peaks and cut all above the band limit."""
    thinned = signal.sosfilt(signal.butter(4, 40, "highpass", fs=SR, output="sos"), dry)
    rounded = thinned / (1 + (thinned / .9) ** 4) ** .25
    return filtered(rounded, lambda hz: 1 / (1 + (hz / TOP_HZ) ** 80))


dry = scene()
out = record(dry)
store_wav(out)
```